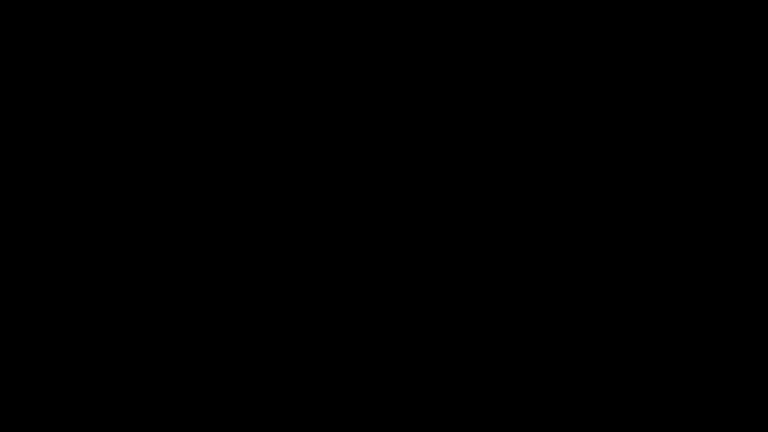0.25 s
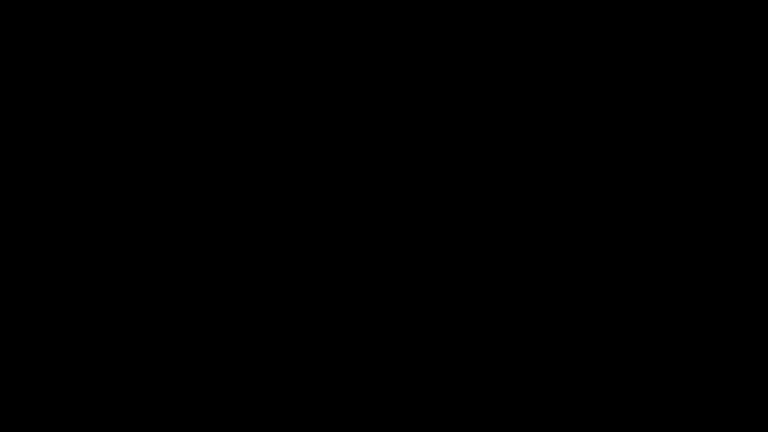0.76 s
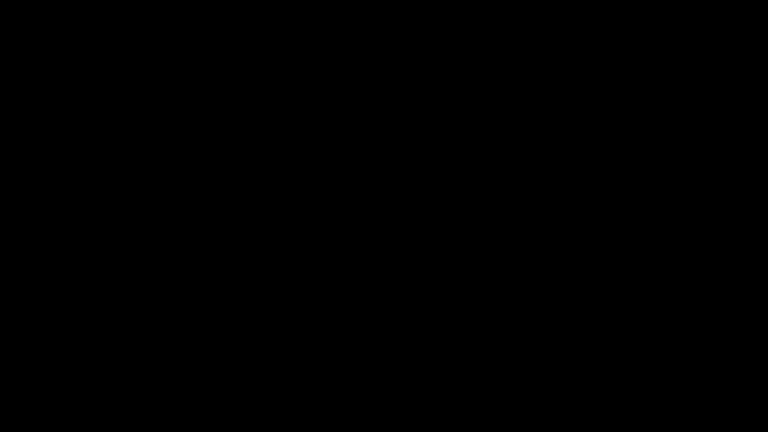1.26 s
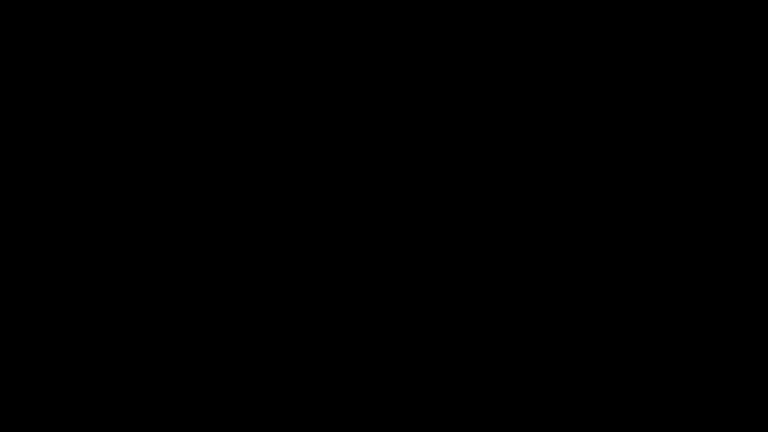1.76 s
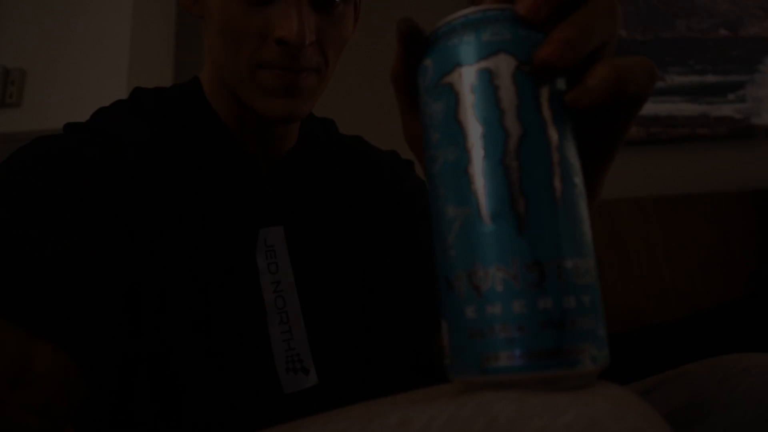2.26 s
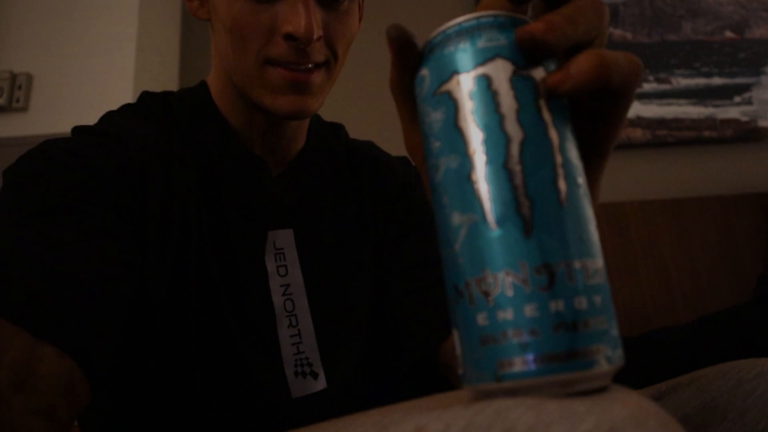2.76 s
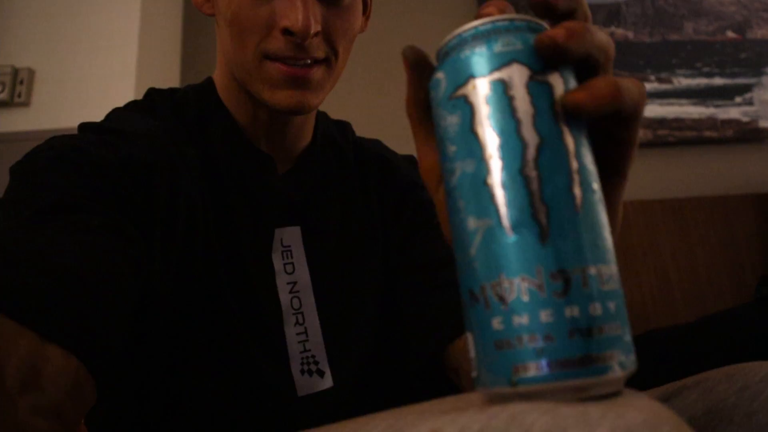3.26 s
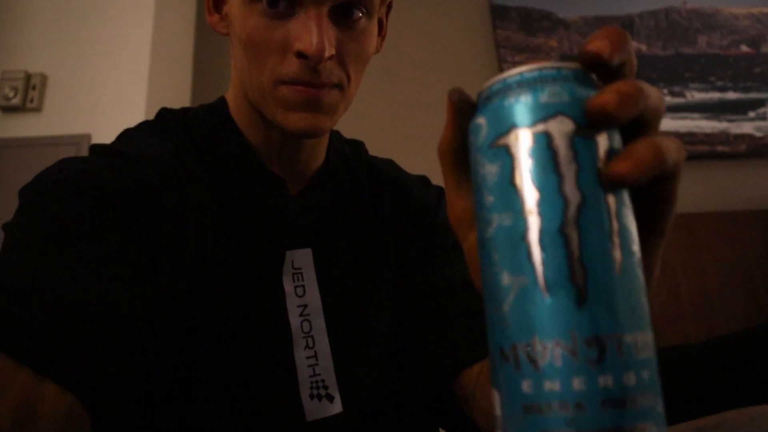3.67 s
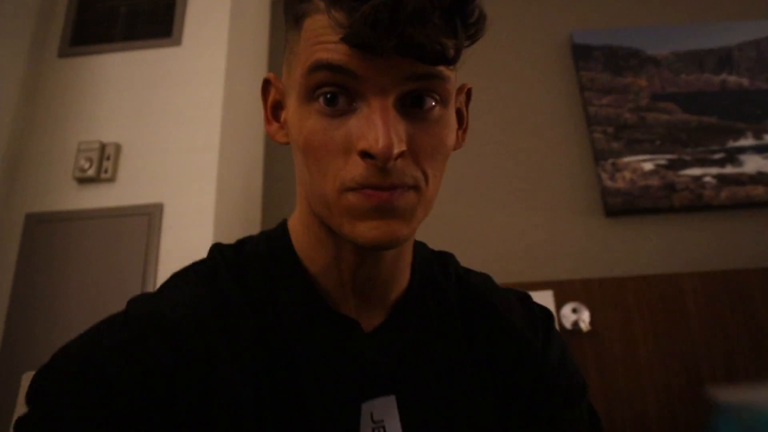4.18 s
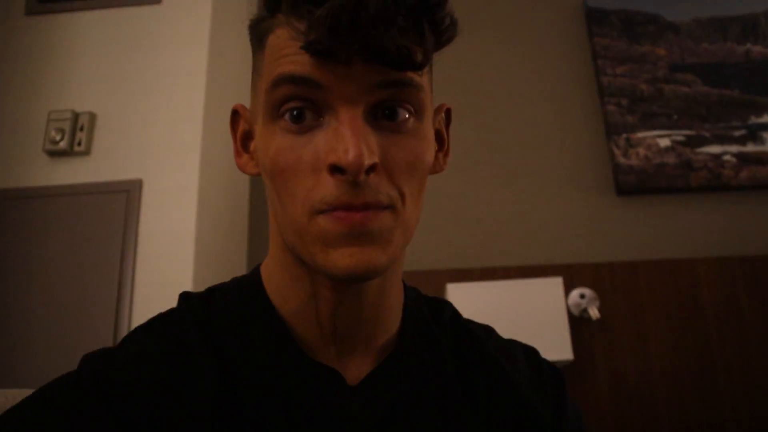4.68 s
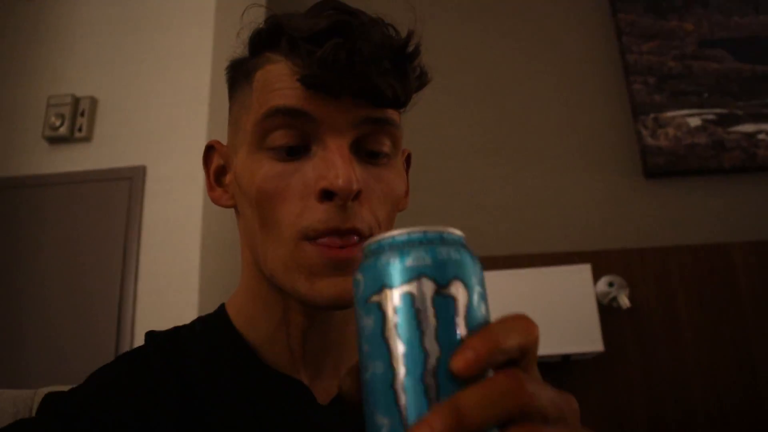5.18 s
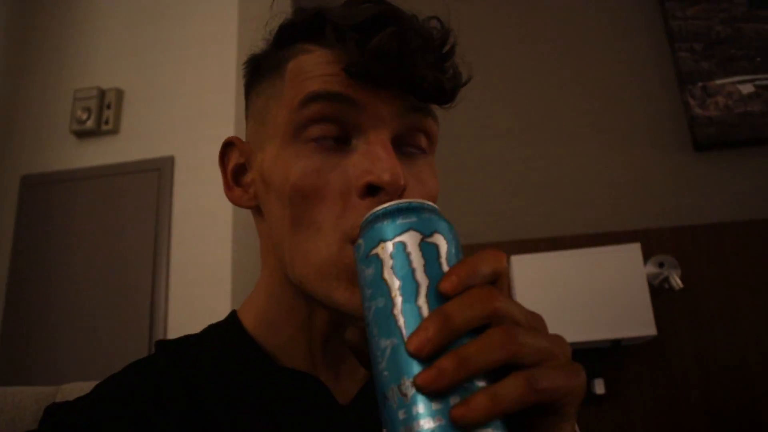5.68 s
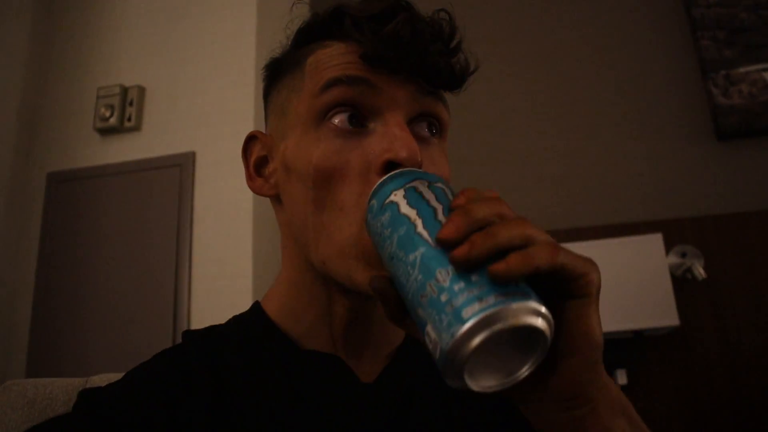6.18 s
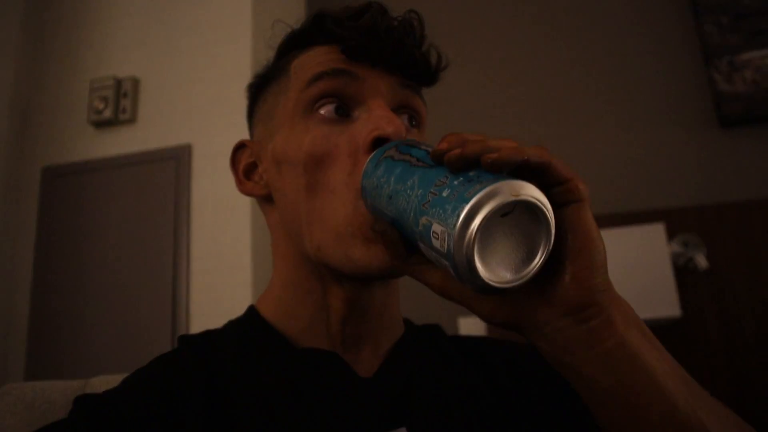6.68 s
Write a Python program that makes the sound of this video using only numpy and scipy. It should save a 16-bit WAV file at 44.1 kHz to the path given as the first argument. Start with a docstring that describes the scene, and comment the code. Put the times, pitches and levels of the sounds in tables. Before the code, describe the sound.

A drink can is cracked open close to the microphone with sharp metallic snaps and a short gassy hiss, then light handling in a quiet room.

```python
"""A drink can is opened close to a small microphone in a quiet room: room tone and hiss run throughout.
A few faint clicks and a brush of cloth, then the tab cracks the lid in bursts of struck, ringing modes.
Gas, shaped noise, leaks, seeps and vents, with a neck hum and rising bubble notes. A short spurt follows,
then a hollow knock leading straight into a second spurt; a hand's grip and rustling cloth come next, all
noise; late on, fingers slide and the wall sings in wavering sines. Loud cracks duck and overload the input."""
import sys
import numpy as np
from scipy import signal
from scipy.fft import rfft, irfft, next_fast_len
from scipy.io import wavfile
from scipy.ndimage import uniform_filter1d

SR = 44100
rng = np.random.default_rng(int(sys.argv[2]) if len(sys.argv) > 2 else 0)


def output_pcm(signal):
    """Save a mono or channel-first signal as 16-bit PCM at the path in sys.argv[1].

    Samples are clipped to [-1, 1] before scaling.
    """
    pcm = np.clip(np.atleast_2d(signal).T, -1, 1) * 32767
    wavfile.write(sys.argv[1], SR, np.round(pcm).astype(np.int16))


N = 306054

# All levels apply ahead of the gain control and the input overload.
# Colours give the level per Hz, up to an overall gain; peaks are resonances lifted above the colour.
# Swells: t is when full level is reached.

# Room tone, growing a little louder: t/s, level/dB
ROOM_LEVEL = [(0.0, -49.5), (2.9, -49), (5.2, -47), (6.94, -45.5)]
# Room tone colour: f/Hz, level/dB
ROOM_COLOUR = [(15, -43.5), (25, -4), (60, 0.5), (107, -4.5), (134, -2.5), (182, -2.5), (253, -5),
               (295, 1.5), (344, -6), (437, -2.5), (838, -16.5), (1500, -18), (1950, -46), (3300, -120)]
# Room tone resonances: f/Hz, width/Hz, lift/dB
ROOM_PEAKS = [(72, 23, 4), (140, 12, 5), (183, 9, 5.5), (217, 14, 3), (289, 17, 2), (450, 11, 2.5)]
# Microphone hiss colour: f/Hz, level/dB
MIC_COLOUR = [(410, -35), (700, -8), (1050, -19.5), (1970, -8), (3360, -14.5), (4590, -15), (5040, -15.5),
              (15900, -20)]
MIC_HISS_DB = -57.5

# Clicks of tab, lid and fingers: t/s, then blow level/dB on lid, rim, tab, score line
CLICKS = [(0.018, -33.5, -22, -18, -29.5), (0.0997, -41, -51, -46, -59), (0.9339, -12.5, -0.5, -10, -6.5),
          (1.006, 4, 3, -8, -12.5), (1.0163, -8.5, -16, -30.5, -31), (1.201, -27.5, -44, -35, -56),
          (1.3239, -10, -12.5, -17, -7.5), (1.327, -1, -20, -2.5, -7.5), (1.3355, -5.5, -8.5, 1.5, -5.5),
          (1.389, -15, -27, -17, -28.5), (1.433, -22, -32.5, -28, -42), (1.4438, -15, -27.5, -21, -26),
          (1.451, -13, -28.5, -16.5, -13), (1.4591, -14.5, -34, -32, -18), (1.4628, -8, -22.5, -19, -21),
          (1.469, -3, -17, -18, -22.5), (1.4746, 1, -17, -14.5, -24), (1.477, 6, 7.5, -2.5, 2),
          (1.7861, -19, -46, -54, -52), (1.7987, -17, -60, -53, -29), (1.9459, -30, -40, -43, -46.5),
          (1.9986, -47, -51, -39.5, -45), (2.4647, -43, -31.5, -46, -34), (2.4697, -16, -18, -13, -6),
          (2.4842, -23, -28, -21.5, -18.5), (2.65, -32.5, -25, -37.5, -50),
          (2.7482, -38, -31.5, -25.5, -17), (2.753, -38.5, -24, -24.5, -9),
          (2.7562, -45.5, -18.5, -12.5, -10), (2.759, -38, -35, -18.5, -9), (2.761, -38, -15.5, -13.5, -2),
          (2.977, -50, -46, -47, -48), (3.5665, -40, -65, -67, -62.5), (3.6313, -43, -50, -70, -62),
          (3.6623, -26.5, -20, -20, -24), (4.63, -21, -59, -63, -66), (5.3608, -52, -56, -28, -36),
          (5.4285, -70, -41, -49, -43)]
# Blows on the side that set the hollow body ringing: t/s, blow level/dB
SIDE_BLOWS = [(1.469, -17.5), (1.477, -11.5), (2.4706, -22.5), (2.4845, -34), (2.7566, -25.5),
              (3.6624, -28.5)]
# Ringing modes of the can: part (0-7), f/Hz, level/dB, t60/s before the hand damps it
CAN_MODES = [(0, 290, -7, 0.029), (1, 1130, 8, 0.0076), (2, 1827, -2, 0.017), (2, 2154, -6, 0.013),
             (3, 2602, 4, 0.01), (4, 3397, 0.5, 0.008), (4, 4032, -3, 0.012), (5, 5136, -5, 0.013),
             (5, 5850, -5, .012), (5, 6670, -7, 0.011), (6, 6810, -17.5, 0.0087), (6, 7970, 2, 0.0091),
             (6, 9250, -6, .008), (7, 10390, -14, .005), (7, 12360, -3.5, .006), (7, 12910, -7, 0.0033),
             (7, 14400, -13, .005)]
# Reach of a blow; rows: struck on lid, rim, tab, score line, side;
# columns: level/dB at thump, body, lid, rim, wall, tab, score line, tear
REACH = [(-42.5, -25, 0.5, -34.5, -25.5, -30, -30, -29), (-36, -44.5, -41, -8, 0, -24.5, -29.5, -32),
         (-39, -40.5, -39.5, -24, -27, 1, -24, -20), (-29.5, -40, -40, -24.5, -30, -25, -1.5, -1),
         (-15.5, 0, -30, -30, -40, -39.5, -40, -40)]
RING_SHARE = 0.98   # the hand shortens every ring to this share of its t60

# Brushing cloth, swells: t/s, level/dB, rise/s, hold/s, fall/(dB/s)
BRUSH_SWELLS = [(0.03, -47.5, 0.017, 0.0045, 250), (3.67, -43.5, 0.011, .002, 210),
                (3.765, -52.5, 0.045, .002, 300), (3.835, -51, .04, 0.0017, 200),
                (5.175, -45, 0.042, 0.028, 190), (5.33, -49, .1, 0.0017, 348)]
# Brushing cloth colour: f/Hz, level/dB
BRUSH_COLOUR = [(600, -28), (1300, -2), (2500, -4), (4500, 1.5), (5500, -2), (8500, -1), (10000, -10),
                (15500, -15)]

# Gas leak at the rivet, swells: t/s, level/dB, rise/s, hold/s, fall/(dB/s)
LEAK_SWELLS = [(.94, -21.5, .005, .005, 600), (.968, -18.5, .03, 0.023, 795), (.992, -15, .04, 0.02, 800),
               (1.035, -32.5, .02, .01, 300)]
# Leak colour: f/Hz, level/dB
LEAK_COLOUR = [(470, -57), (800, -28.5), (1920, -12), (3010, -8), (5290, -2), (5920, -15), (6880, 3.5),
               (10500, -8), (13700, 1), (15900, -9)]
# Leak resonances: f/Hz, width/Hz, lift/dB
LEAK_PEAKS = [(7100, 360, 1.2), (8400, 400, 6.2), (11600, 500, 6), (13800, 650, 3)]

# Ringing headspace, swells: t/s, level/dB, rise/s, hold/s, fall/(dB/s)
HEADSPACE_SWELLS = [(1.02, -30.5, .02, 0.049, 140)]
# Headspace colour: f/Hz, level/dB
HEADSPACE_COLOUR = [(410, -56), (700, -20.5), (1750, -0.5), (2910, -12.5), (3930, -2.5), (4540, -8.5),
                    (8950, -14), (15900, -33)]
# Headspace resonances: f/Hz, width/Hz, lift/dB
HEADSPACE_PEAKS = [(1784, 490, 5), (3700, 300, 5.9), (4800, 330, 8.4), (6260, 300, 3.6), (8800, 300, 3.3)]

# Gas seeping at the score line, swells: t/s, level/dB, rise/s, hold/s, fall/(dB/s)
SEEP_SWELLS = [(1.34, -21, 0.024, 0.0018, 300), (1.4, -29.5, .08, .005, 447), (1.47, -31.5, .08, .005, 450)]
# Seep colour: f/Hz, level/dB
SEEP_COLOUR = [(410, -76.5), (700, -33.5), (1790, -14), (2490, -16), (4300, -11.5), (5660, -4),
               (13100, -16.5), (15900, -28.5)]
# Seep resonances: f/Hz, width/Hz, lift/dB
SEEP_PEAKS = [(1800, 300, 8), (5760, 670, 5.5), (9040, 400, 3)]

# Gas venting through the open hole, swells: t/s, level/dB, rise/s, hold/s, fall/(dB/s)
VENT_SWELLS = [(1.484, -20.5, 0.0072, 0.087, 140), (1.79, -41, 0.023, .005, 450),
               (1.85, -58, 0.047, 0.069, 80)]
# Vent colour: f/Hz, level/dB
VENT_COLOUR = [(400, -45.5), (750, -17), (1300, -11.5), (2400, -12), (3600, -10.5), (5000, -21),
               (8000, -24.5), (10500, -27), (14100, -35), (15900, -49.5)]
# Vent resonances: f/Hz, width/Hz, lift/dB
VENT_PEAKS = [(700, 70, 6.7), (1760, 150, 4), (2050, 250, 8.4), (3140, 380, 7.9), (6400, 240, 4),
              (8700, 840, 8)]

# Bubbles bursting in the opening: t/s, level/dB, starting pitch f/Hz, t60/s
BUBBLES = [(1.487, -8, 1070, 0.026), (1.638, -17.5, 1230, 0.021), (1.66, -37, 885, .03),
           (1.69, -40, 690, 0.18), (1.725, -28.5, 1340, 0.035), (1.785, -25, 1240, 0.028),
           (1.801, -25.5, 1270, 0.022), (1.89, -39.5, 1020, 0.055), (1.947, -29.5, 1270, 0.029),
           (2.004, -46, 1144, 0.035), (2.015, -47, 2030, 0.028)]

# Air humming in the opening, swells: t/s, level/dB, rise/s, hold/s, fall/(dB/s)
NECK_SWELLS = [(1.488, -25.5, 0.011, 0.1, 200), (1.72, -48.5, .05, .02, 85), (1.9, -51, 0.13, .005, 130),
               (2.0, -64, .1, 0.032, 232)]
# Neck hum colour: f/Hz, level/dB
NECK_COLOUR = [(500, -52.5), (900, -2), (1090, -1.5), (1350, -12), (2200, -43)]

# First short gas spurt, swells: t/s, level/dB, rise/s, hold/s, fall/(dB/s)
PUFF_SWELLS = [(2.475, -24, 0.025, 0.0013, 516), (2.5, -44, 0.018, 0.0101, 200)]
# First spurt colour: f/Hz, level/dB
PUFF_COLOUR = [(290, -42), (500, -6), (2100, -3), (2570, -10), (4200, -6.5), (5370, -7), (8910, -8),
               (15900, -20)]
# First spurt resonances: f/Hz, width/Hz, lift/dB
PUFF_PEAKS = [(1600, 500, 6.1), (4400, 258, 6.1), (8790, 1200, 2.9)]

# Can knocking hollowly in the hand, swells: t/s, level/dB, rise/s, hold/s, fall/(dB/s)
KNOCK_SWELLS = [(2.754, -29.5, 0.0086, 0.0051, 586), (2.785, -41, .03, 0.018, 700)]
# Knock colour: f/Hz, level/dB
KNOCK_COLOUR = [(120, -45), (240, -8.5), (310, 3), (480, -5.5), (750, -14.5), (1300, -40)]

# Second short gas spurt, swells: t/s, level/dB, rise/s, hold/s, fall/(dB/s)
SPURT_SWELLS = [(2.765, -22.5, 0.02, 0.0029, 294), (2.815, -29, .05, 0.0075, 650),
                (2.84, -45.5, .05, .005, 240)]
# Second spurt colour: f/Hz, level/dB
SPURT_COLOUR = [(150, -30), (300, -16), (600, -13), (900, -17), (3000, -17), (4000, -14.5), (5100, -6.5),
                (6300, -13), (8000, 1), (10500, -16), (15900, -19)]
# Second spurt resonances: f/Hz, width/Hz, lift/dB
SPURT_PEAKS = [(2700, 310, 3.4), (5153, 300, 4.6), (7580, 750, 3.6), (9600, 540, 2.7)]

# Clothing rustling as the arm moves: t/s, level/dB
RUSTLE_LEVEL = [(2.9, -49.5), (3.02, -62.5), (3.6, -65), (3.85, -58.5), (4.2, -51.5), (4.33, -55.5),
                (4.55, -53), (4.7, -56), (5.1, -59), (5.35, -57), (5.8, -66.5), (6.8, -61.5), (6.94, -58)]
# Rustle colour: f/Hz, level/dB
RUSTLE_COLOUR = [(400, -20), (900, -4), (1500, -0.5), (2200, -3.5), (3500, -3), (5500, -11), (9000, -11),
                 (11000, -27), (15900, -36)]

# Skin gripping the wall, swells: t/s, level/dB, rise/s, hold/s, fall/(dB/s)
GRIP_SWELLS = [(2.93, -46, .025, 0.033, 450), (5.52, -46.5, .05, 0.033, 370), (5.6, -35, 0.017, 0.013, 110),
               (5.67, -42, 0.063, 0.012, 201), (5.76, -63, 0.079, 0.0043, 120)]
# Grip colour: f/Hz, level/dB
GRIP_COLOUR = [(150, -32), (250, -1), (806, -4), (884, -7), (1570, -16), (2490, -14), (2740, -10),
               (6000, -33), (7800, -60), (13200, -120)]
# Grip resonances: f/Hz, width/Hz, lift/dB
GRIP_PEAKS = [(817, 28, 9.2), (1530, 390, 12), (2757, 52, 10.9), (3350, 130, 6.6)]

# Fingers sliding over the metal, swells: t/s, level/dB, rise/s, hold/s, fall/(dB/s)
SLIDE_SWELLS = [(5.37, -44, .03, .02, 100), (5.402, -34.5, .05, .002, 220), (5.515, -41, 0.066, .005, 150),
                (5.6, -46.5, 0.2, .002, 420), (5.66, -47, 0.044, .002, 290)]
# Slide colour: f/Hz, level/dB
SLIDE_COLOUR = [(1500, -28), (2800, -16), (4000, -13), (5700, -7), (6400, -4.5), (8500, -0.5), (9500, -5),
                (14300, -7), (15900, -2.5)]
# Slide resonances: f/Hz, width/Hz, lift/dB
SLIDE_PEAKS = [(6600, 150, 11), (7060, 170, 9.2), (7400, 150, 4.3), (8230, 140, 10.6), (8700, 110, 7.6),
               (11000, 150, 3.6), (14200, 300, 5)]

# Wall singing under the finger, swells: t/s, level/dB, rise/s, hold/s, fall/(dB/s)
SING_SWELLS = [(5.4, -44, .055, 0.035, 320), (5.53, -52.5, 0.22, .005, 120), (5.62, -60, .1, 0.034, 360)]
# Modes of the singing wall: f/Hz, level/dB
SING_MODES = [(2685, -10), (3090, -11), (4385, -0.5), (4900, -11), (5210, -7), (6380, -6.5), (6920, -11),
              (8390, -10)]

RISE_DB = 40   # a swell climbs this far during its rise time
ECHO_DB, ECHO_T60_S = -21, 0.26
# Gain control: ducks by a share of the excess, lets go quickly at first, then slowly
DUCK_FROM_DB, DUCK_SHARE, DUCK_ATTACK_S = -5.5, 1.33, 0.013
QUICK_DB_PER_S, SLOW_SHARE, SLOW_DB_PER_S = 200, .35, 4
CLIP_LEVEL, CUTOFF_HZ = 1.0, 15950


def from_db(db):
    """Turn decibels into an amplitude factor."""
    return 10 ** (np.asarray(db) / 20)


def rms_one(x):
    """Bring a signal to rms 1."""
    return x / np.sqrt(np.mean(x ** 2) + 1e-20)


def envelope(rows):
    """Gain drawn through (t/s, level/dB) points, silent outside them."""
    s, level_db = np.transpose(rows)
    return from_db(np.interp(np.arange(N) / SR, s, level_db, left=-200, right=-200))


def swells(rows):
    """Gain over time: each swell climbs, holds and dies away; overlapping swells add in power."""
    t, power = np.arange(N) / SR, 0
    for s, level_db, rise_s, hold_s, fall in rows:
        climbing = RISE_DB * (s - t) / rise_s
        dying = fall * (t - s - hold_s)
        below_db = np.clip(np.maximum(climbing, dying), 0, 150)
        power = power + from_db(2 * (level_db - below_db))
    return np.sqrt(power)


def drift(rate_hz):
    """Slow chance movement of rms 1: noise through two equal one-pole lowpasses."""
    r = np.exp(-2 * np.pi * rate_hz / SR)
    return rms_one(signal.lfilter([1], [1, -2 * r, r * r], rng.standard_normal(N)))


def hiss(colour, peaks, rough_db, rough_hz):
    """Noise with a fluttering level, coloured and lifted at its resonances; rms 1."""
    size = next_fast_len(N)
    hz = np.maximum(np.arange(size // 2 + 1) * SR / size, 1)
    colour_hz, colour_db = np.transpose(colour)
    gain = from_db(np.interp(np.log(hz), np.log(colour_hz), colour_db))
    for centre_hz, width_hz, lift_db in peaks:
        gain = gain * from_db(lift_db / (1 + (2 * (hz - centre_hz) / width_hz) ** 2))
    flutter = from_db(rough_db * drift(rough_hz))
    spectrum = rfft(rng.standard_normal(N) * flutter, size)
    return rms_one(irfft(spectrum * gain, size)[:N])


def room_tone():
    """Low, resonant noise of the quiet room, slowly growing."""
    return envelope(ROOM_LEVEL) * hiss(ROOM_COLOUR, ROOM_PEAKS, rough_db=.6, rough_hz=8)


def mic_hiss():
    """Steady bed of coloured microphone noise."""
    return from_db(MIC_HISS_DB) * hiss(MIC_COLOUR, [], rough_db=1.15, rough_hz=30)


def can_clicks(crunch=0.94, crunch_s=0.00037, spread_db=2.5, detune=0.055):
    """Crunchy blows ring the can's modes; grip and bending shift the modes a little every time."""
    silent = -np.inf
    clicks = [(*row, silent) for row in CLICKS]
    side_blows = [(s, *[silent] * 4, db) for s, db in SIDE_BLOWS]
    blows = np.array(clicks + side_blows)
    part, mode_hz, mode_db, t60 = np.transpose(CAN_MODES)
    t, after = np.arange(SR // 12) / SR, np.arange(SR // 200)
    grit = rng.standard_normal((len(blows), len(after)))
    chance = rng.standard_normal((len(blows), 2, len(CAN_MODES)))
    # power from every struck place adds up at each part, and drives that part's modes
    part_drive = np.sqrt(from_db(2 * blows[:, 1:]) @ from_db(2 * np.array(REACH)))
    mode_drive = part_drive[:, np.round(part).astype(int)]
    decay = from_db(-60 * t / (RING_SHARE * t60)[:, None])
    polarity = (-1) ** np.arange(len(CAN_MODES))
    out = np.zeros(N + SR)
    for s, drive, noise, (louder, higher) in zip(blows[:, 0], mode_drive, grit, chance):
        blow = crunch * noise * np.exp(-after / (crunch_s * SR)) / np.sqrt(crunch_s * SR)
        blow[0] = 1   # the sharp hit ahead of the crunch
        strength = drive * from_db(mode_db + spread_db * louder) * polarity
        shifted_hz = mode_hz * (1 + detune * higher)
        ring = strength @ (decay * np.sin(2 * np.pi * shifted_hz[:, None] * t))
        sound, at = np.convolve(ring, blow), round(s * SR)
        out[at:at + len(sound)] += sound
    return out[:N]


def cloth_brush():
    """Cloth brushes past in short strokes of bright noise."""
    peaks = [(2570, 310, 8.1), (4230, 440, 2.1)]   # f/Hz, width/Hz, lift/dB
    return swells(BRUSH_SWELLS) * hiss(BRUSH_COLOUR, peaks, rough_db=2.5, rough_hz=121)


def rivet_leak():
    """Gas leaks at the rivet as bright turbulent noise."""
    return swells(LEAK_SWELLS) * hiss(LEAK_COLOUR, LEAK_PEAKS, rough_db=0.5, rough_hz=300)


def headspace_ring():
    """The headspace rings: turbulent noise lifted at its resonances."""
    noise = hiss(HEADSPACE_COLOUR, HEADSPACE_PEAKS, rough_db=1.5, rough_hz=150)
    return swells(HEADSPACE_SWELLS) * noise


def score_line_seep():
    """Gas seeps at the score line as roughly fluttering turbulence."""
    return swells(SEEP_SWELLS) * hiss(SEEP_COLOUR, SEEP_PEAKS, rough_db=4.0, rough_hz=150)


def open_vent():
    """Gas vents through the open hole as broad turbulent noise."""
    return swells(VENT_SWELLS) * hiss(VENT_COLOUR, VENT_PEAKS, rough_db=0.5, rough_hz=120)


def bubbles(rise=.12):
    """A bubble sings one short, dying note that climbs as it closes."""
    out, t = np.zeros(N), np.arange(SR // 12) / SR
    for s, level_db, hz, t60 in BUBBLES:
        onset = np.minimum(t / 0.0005, 1)
        note = np.sin(2 * np.pi * hz * t * (1 + rise * t / t60)) * onset
        at = round(s * SR)
        out[at:at + len(t)] += from_db(level_db - 60 * t / t60) * note
    return out


def neck_hum():
    """Air in the opening hums like a bottle neck while gas streams out: noise with one narrow peak."""
    return swells(NECK_SWELLS) * hiss(NECK_COLOUR, [(1116, 70, 10)], rough_db=4.0, rough_hz=60)


def first_spurt():
    """A short gas spurt: turbulence with a very rough level."""
    return swells(PUFF_SWELLS) * hiss(PUFF_COLOUR, PUFF_PEAKS, rough_db=8.5, rough_hz=248.6)


def hollow_knock():
    """The can knocks hollowly in the hand: a short burst of low noise."""
    return swells(KNOCK_SWELLS) * hiss(KNOCK_COLOUR, [], rough_db=0.5, rough_hz=100)


def second_spurt():
    """Another short gas spurt, with smoother turbulence."""
    return swells(SPURT_SWELLS) * hiss(SPURT_COLOUR, SPURT_PEAKS, rough_db=1.5, rough_hz=250)


def clothing_rustle():
    """Clothing rustles as the arm moves: fluttering noise that follows the drawn level."""
    noise = hiss(RUSTLE_COLOUR, [(2870, 300, 2.2)], rough_db=2.5, rough_hz=200)
    return envelope(RUSTLE_LEVEL) * noise


def hand_grip():
    """Skin grips the thin wall: low rubbing noise with narrow resonances."""
    return swells(GRIP_SWELLS) * hiss(GRIP_COLOUR, GRIP_PEAKS, rough_db=2.0, rough_hz=200)


def finger_slide():
    """Skin slides over the thin wall: bright rubbing noise with narrow resonances."""
    return swells(SLIDE_SWELLS) * hiss(SLIDE_COLOUR, SLIDE_PEAKS, rough_db=0.9, rough_hz=250)


def singing_wall(waver_db=4.0, waver_hz=40, wander_hz=18):
    """Modes kept alive by stick and slip: sines that waver in strength and a little in pitch."""
    song = np.zeros(N)
    for hz, level_db in SING_MODES:
        strength = from_db(level_db + waver_db * drift(waver_hz))
        pitch_hz = hz + wander_hz * drift(waver_hz)
        song += strength * np.sin(2 * np.pi * np.cumsum(pitch_hz) / SR)
    return swells(SING_SWELLS) * song


def room(x):
    """A dense noise tail builds up after the nearest walls and dies evenly."""
    t = np.arange(SR // 2) / SR
    build_up = np.clip((t - .003) / .012, 0, 1)
    tail = rng.standard_normal(len(t)) * from_db(-60 * t / ECHO_T60_S) * build_up
    tail = signal.lfilter([1], [1, -.3], tail)   # soft furnishings dull it a little
    tail = tail / np.sqrt(np.sum(tail ** 2))
    return from_db(ECHO_DB) * signal.fftconvolve(x, tail)[:N]


def gain_control(x):
    """Loud cracks pull the gain down a moment later; it returns in a quick and a slow stage."""
    power = np.abs(uniform_filter1d(x ** 2, size=88))   # smoothed over 2 ms
    level_db = 10 * np.log10(power + 1e-12)
    duck_db = DUCK_SHARE * np.maximum(level_db - DUCK_FROM_DB, 0)
    t = np.arange(N) / SR
    # each stage keeps the deepest duck so far, let go at a steady rate
    quick_fall, slow_fall = QUICK_DB_PER_S * t, SLOW_DB_PER_S * t
    quick = np.maximum.accumulate(duck_db + quick_fall, axis=-1) - quick_fall
    slow = np.maximum.accumulate(SLOW_SHARE * duck_db + slow_fall, axis=-1) - slow_fall
    r = np.exp(-1 / (DUCK_ATTACK_S * SR))
    smooth_db = signal.lfilter([(1 - r) ** 2], [1, -2 * r, r * r], np.maximum(quick, slow))
    return x * from_db(-smooth_db)


def scene():
    """Can and gas with their echo, then handling and the noise beds on top without it."""
    near = can_clicks() + bubbles()
    near = near + rivet_leak() + headspace_ring() + score_line_seep() + open_vent() + neck_hum()
    near = near + first_spurt() + second_spurt()
    beds = room_tone() + mic_hiss()
    echo = room(near)
    hand = finger_slide() + singing_wall() + hollow_knock() + hand_grip()
    cloth = clothing_rustle() + cloth_brush()
    return (near + echo + hand + cloth + beds)[None, :]


def record(dry):
    """The loudest cracks overload the input; the excess shifts its bias, heard as a thump; the top is cut."""
    dry = gain_control(dry)
    excess = np.clip(np.abs(dry) - .8, 0, 1.5)
    thump = signal.sosfilt(signal.butter(1, 500, fs=SR, output="sos"), excess)
    loud = np.clip(dry, -CLIP_LEVEL, CLIP_LEVEL) + .15 * thump
    top_cut = signal.cheby2(22, 40, CUTOFF_HZ, fs=SR, output="sos")
    return np.clip(signal.sosfilt(top_cut, loud), -CLIP_LEVEL, CLIP_LEVEL)


dry = scene()
out = record(dry)
output_pcm(out)
```